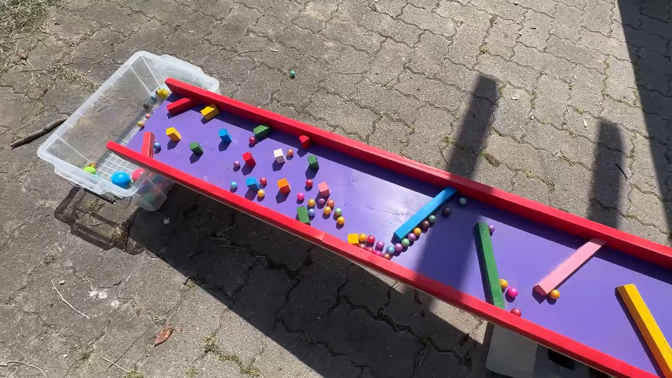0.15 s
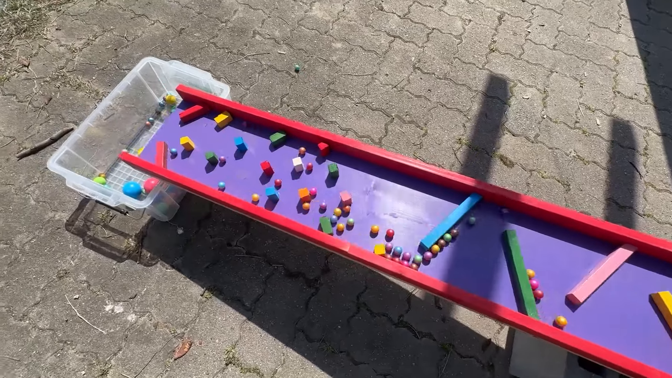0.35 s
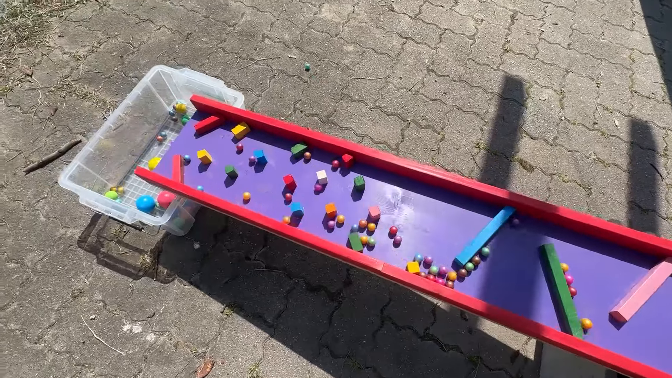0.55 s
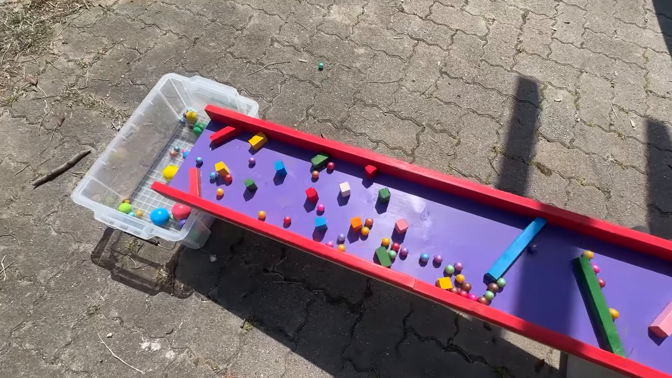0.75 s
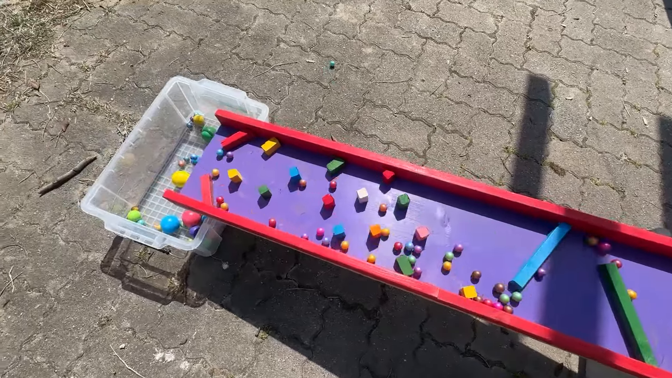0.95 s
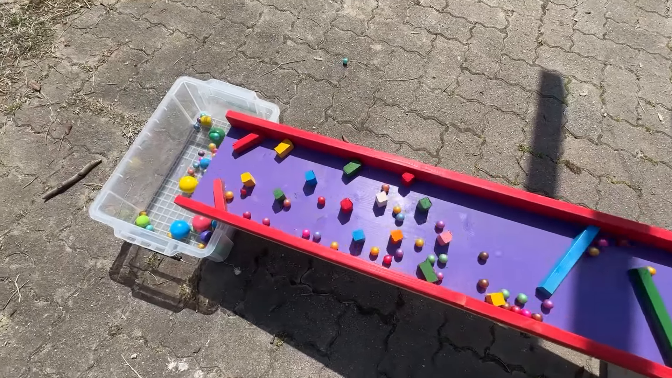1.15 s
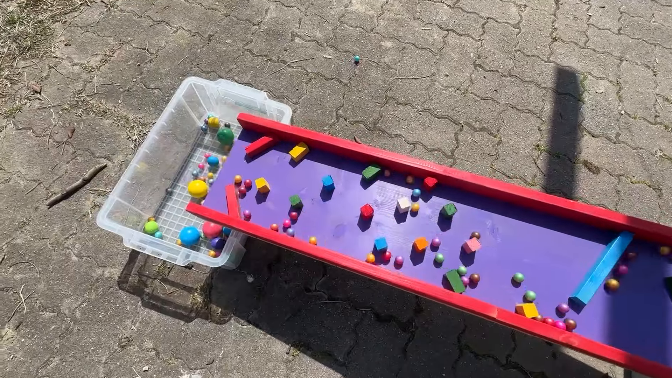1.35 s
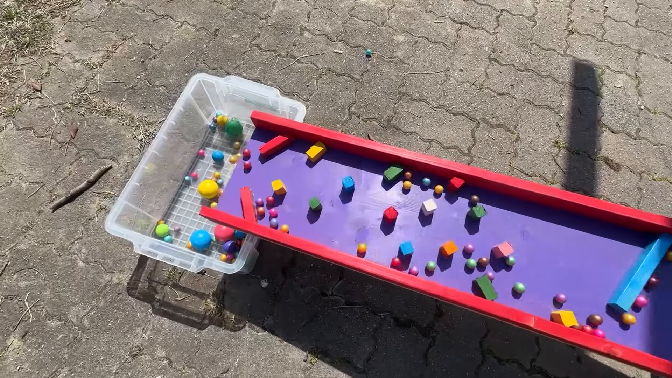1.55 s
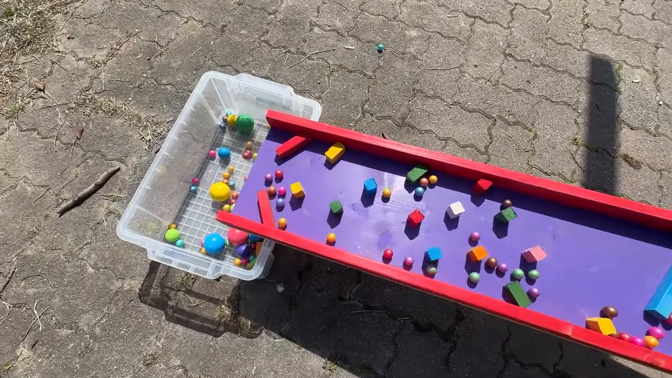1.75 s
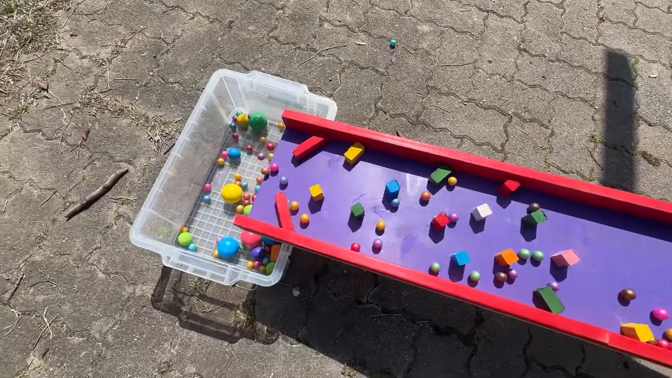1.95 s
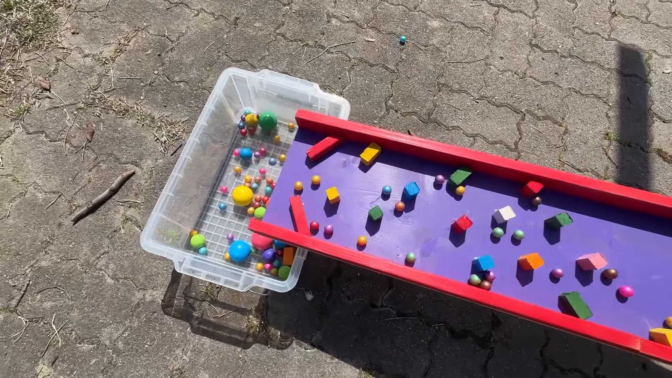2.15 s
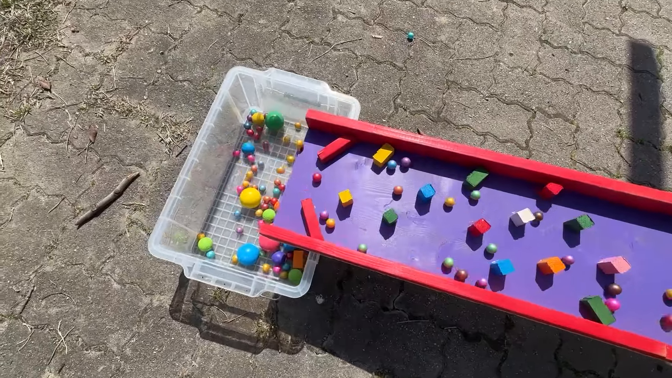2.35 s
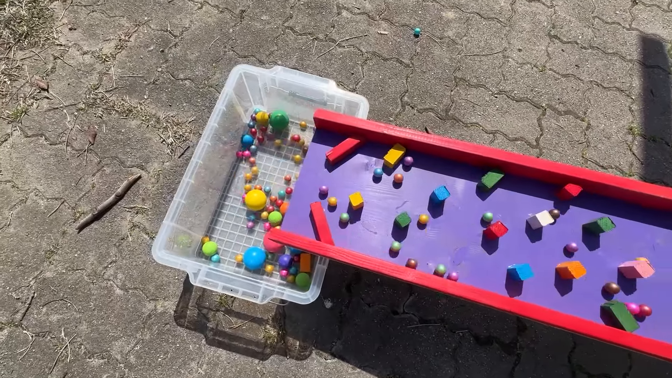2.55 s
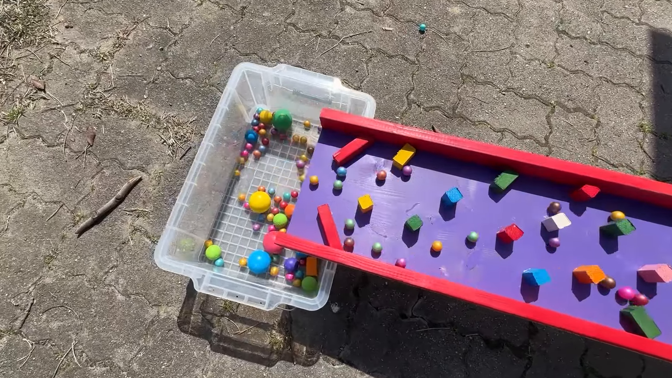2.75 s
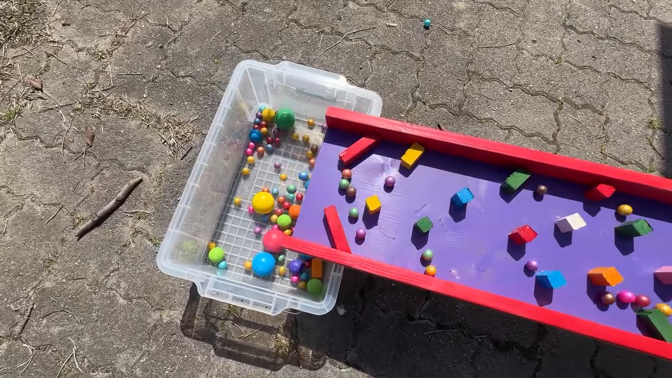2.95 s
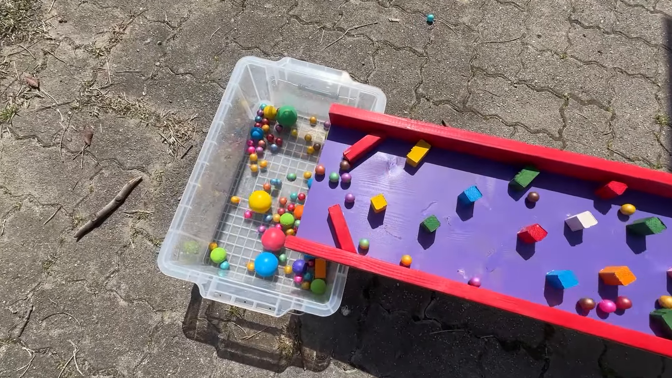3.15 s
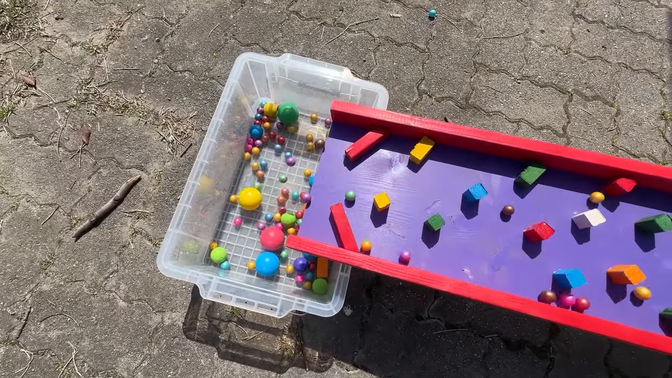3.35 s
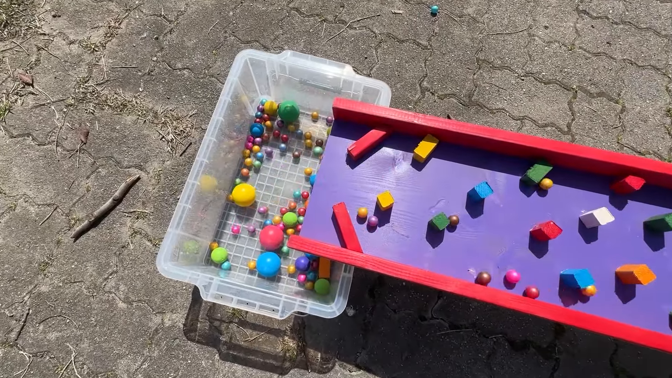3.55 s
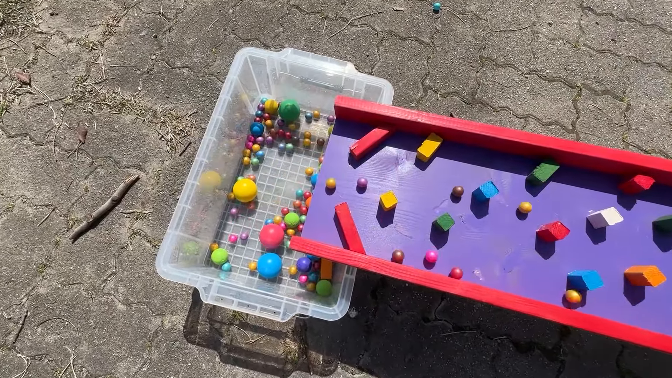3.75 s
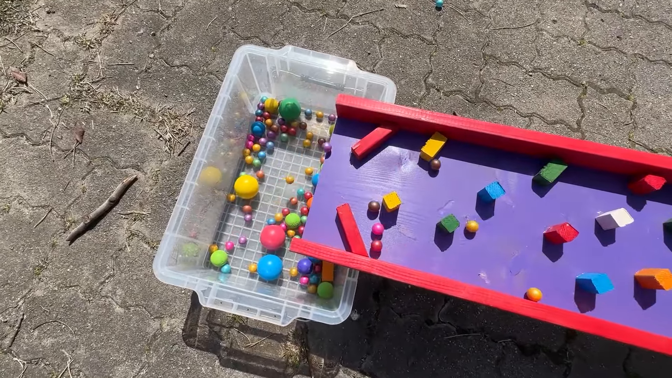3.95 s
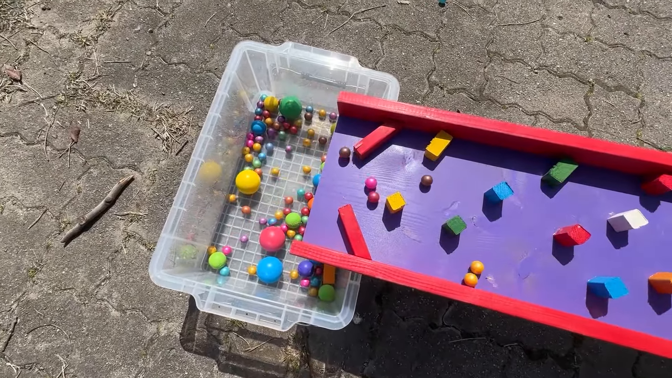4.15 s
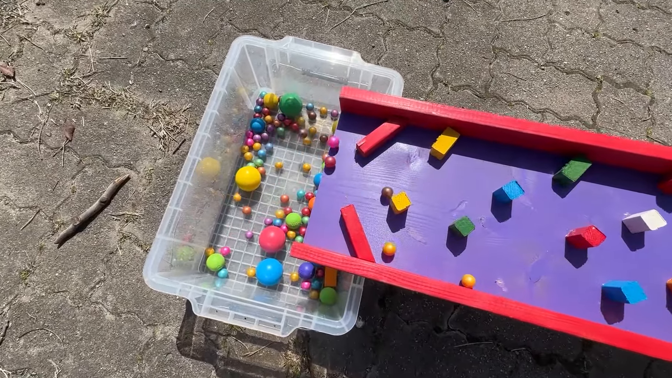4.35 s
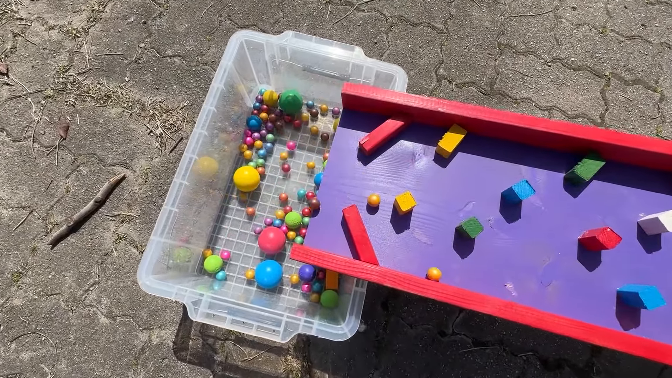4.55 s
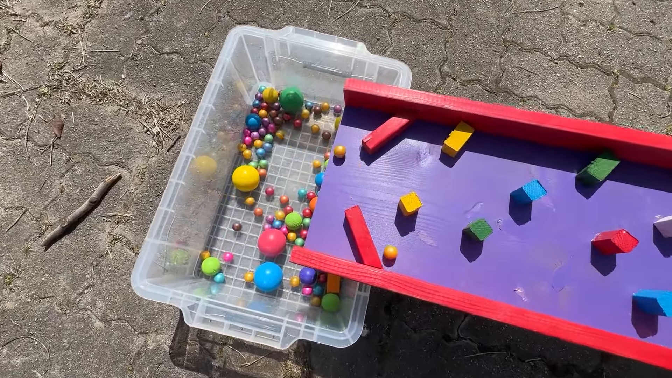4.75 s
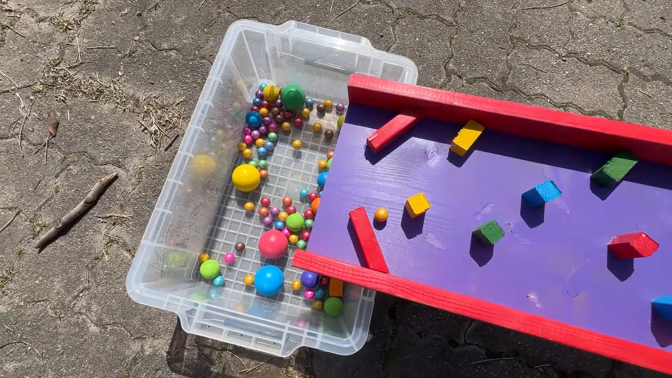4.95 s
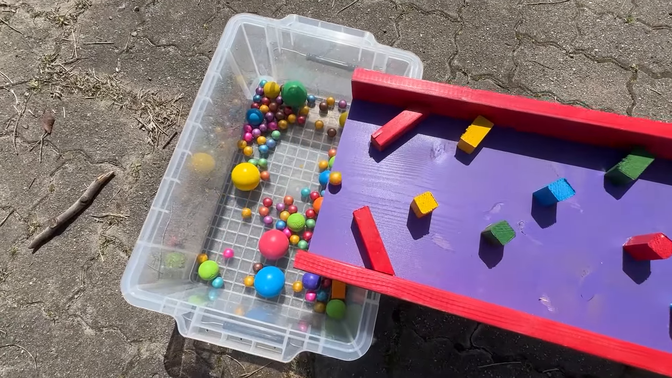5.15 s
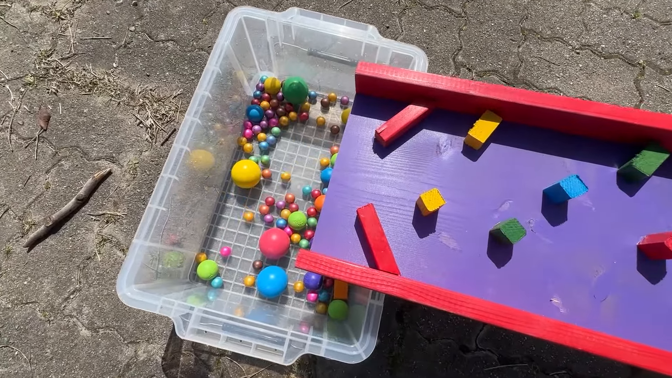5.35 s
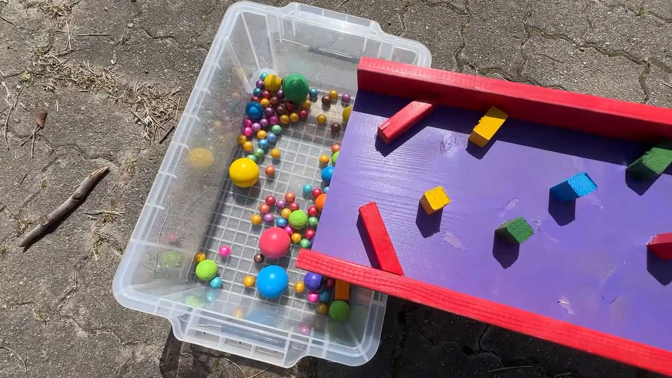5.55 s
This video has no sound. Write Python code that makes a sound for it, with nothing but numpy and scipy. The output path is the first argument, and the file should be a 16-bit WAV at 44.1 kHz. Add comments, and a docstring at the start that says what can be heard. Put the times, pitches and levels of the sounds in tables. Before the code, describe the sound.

A busy woody rattle opens: marbles rolling and bumping into small blocks, clicking against each other. After a lull in the drops, impacts in the plastic tub begin and become dense, sharp on top with a late boxy thump, each followed by settling clicks. Rolling fades as the ramp empties, leaving sparse tub hits and small bounces. Outdoor paving, little echo, the microphone moving closer to the tub.

```python
"""A paved yard: marbles roll down a wooden ramp, knock against the blocks on it and drop into a plastic tub.
Rolling is a train of tiny contacts filtered by the board; each knock is a dry tick and a gliding ring.
Each drop cracks on the thin tub floor, whose bending waves bring the bass late; hard ones stir the pile.
The rolling thins out until the last marble has fallen and bounced to rest, over a low outdoor rumble."""
import sys
import numpy as np
from scipy import signal
from scipy.fft import rfft, irfft
from scipy.io import wavfile
from scipy.ndimage import uniform_filter1d

SR = 44100
rng = np.random.default_rng(int(sys.argv[2]) if len(sys.argv) > 2 else 0)


def log_audio(samples):
    """Write samples as a 16-bit WAV file to the path given in sys.argv[1]."""
    # one column per channel
    frames = np.atleast_2d(samples).T
    # limit to full scale, then quantise
    limited = np.clip(frames, -1, 1)
    pcm = np.round(limited * 32767).astype(np.int16)
    wavfile.write(sys.argv[1], SR, pcm)


N = 247401  # samples

# marbles landing in the tub, before each band's trim: (time [s], strength [dB],
# thump re strength [dB], crack re strength [dB], treble tilt [dB per octave],
# low ring of the struck spot [Hz], its height [dB], high ring [Hz], its height [dB], crack ring [Hz])
DROPS = [(0.078, -25, -13, -3.5, 5.5, 613.0, 2, 825, 4.1, 4540),
         (1.092, -13, -20.5, -14, 5.5, 700.0, 1, 950, 6.1, 2750),
         (1.132, -32, -30.5, -9, -11, 462.0, -2, 1464.0, 4.5, 3850.0),
         (1.191, -25, -34, -8, -11, 640.0, 3.5, 1600.0, 0.5, 2980.0),
         (1.245, -19.5, -16, -6.5, 1.5, 420.0, -11, 1006.0, 3.3, 4400.0),
         (1.256, -15, -20, -14.5, 1.0, 409.0, -9, 1220, 3.5, 3520.0),
         (1.306, -14, -17.5, -9.5, 1.5, 660, 4, 1390, 9.9, 3880),
         (1.716, -13.5, -17, -9, -5.5, 314, 6, 970.0, 10.3, 4300),
         (1.77, -16.0, -9, -1.5, -5.5, 636.0, 11, 1450, 6.1, 3730.0),
         (1.819, -13.5, -13.5, -14, -2.5, 400, -3, 1100, 9.5, 3820.0),
         (2.075, -11.5, -14.5, -14, -6, 410, 2, 1130.0, 5.4, 3860),
         (2.125, -15, -8, -7.5, -6, 339, 9, 850.0, 2.0, 3510.0),
         (2.141, -15.0, -14.5, -8.5, 0.5, 344, 11, 845, 4.7, 3310.0),
         (2.172, -12, -18.0, -9.0, 1, 592.0, 3.5, 940, 2.3, 3110.0),
         (2.278, -13.5, -11.0, -8, 1.5, 600, 11.5, 850, 6.5, 4450),
         (2.483, -14, -16.5, -9, 3.5, 590, 3, 1014, 11, 4020.0),
         (2.537, -12, -9, -8, -0.5, 382, 6.0, 1110, 7, 3920),
         (2.663, -9.5, -13.5, -9, 4, 370, 6.5, 940.0, 1.8, 3500.0),
         (2.918, -11.5, -11.5, -9, -0.5, 293, 7, 910, 3.3, 3570.0),
         (2.993, -13.5, -13.5, -6.5, -1, 340, 2, 1000, 14, 3530),
         (3.07, -20.5, -15, -3, -3, 515, 10, 925.0, 3.0, 4330),
         (3.112, -13.5, -19.5, -7.5, 7.5, 680, 3, 1020, 4.5, 2840),
         (3.18, -23.5, -3, -5, 0, 389, 15.5, 1500, 11, 2830.0),
         (3.217, -18.5, -15, -14.5, -8, 544, 9, 800, 10, 2940.0),
         (3.263, -12, -17.5, -5.5, -5, 560, 6, 1260, 6, 2840),
         (3.37, -10, -16.5, -13, -4, 344.0, 6, 920, 11.5, 2810.0),
         (3.425, -14, -13.5, -7.5, -10, 353, 9, 860, 6.5, 3900),
         (3.448, -8.5, -16, -10, 0.5, 620.0, -1.0, 1230, 5.0, 2810.0),
         (3.529, -10.0, -14.5, -9, 1, 326.0, 0, 986, 8.5, 3260),
         (3.644, -20.5, -20.5, -10, -7, 674, -2, 1300, 8.4, 2880),
         (3.728, -11.5, -10.5, -7.5, 0.0, 364, 5, 1190, 7.5, 3400),
         (3.995, -12.5, -12.5, -8, -1.5, 344.0, 2.5, 980, 8.8, 3100),
         (4.147, -10.0, -9.5, -8.0, 2.0, 380, 7.5, 1510, 5, 3640.0),
         (4.403, -11, -11, -10.5, 2, 362, 15.5, 1410, 5.7, 4020.0),
         (4.527, -28.5, -12.0, -11, 4, 667.0, 6, 1030.0, 1.5, 3680.0),
         (4.55, -9.5, -12.5, -8.0, 3, 298.0, 6, 980, 6.0, 3730),
         (4.581, -16, -17, -16, 0, 363, 4, 794, 2.5, 2810.0),
         (4.63, -16.5, -13, -12.5, -6, 400, 11.5, 1520, 12, 3420.0),
         (4.737, -16, -16, -6.5, -2.5, 640, 16.5, 1190, 2.3, 4180.0),
         (4.751, -17.0, -7.5, -9, 0.5, 405, 12, 820.0, 8.6, 3840),
         (4.813, -20, -17.5, -8, 1, 374, 6, 1670.0, 4.0, 2750),
         (4.886, -21, -17.5, -12.5, -4.5, 260, 11, 1500, 4.5, 4180.0),
         (4.977, -15, -6.5, -5, 2.0, 372.0, 5.5, 1020, 6.1, 3730.0),
         (5.036, -21.5, -14.0, -9, -9, 388, 11, 1115, 16, 3650.0),
         (5.087, -21, -21.5, -16.5, 0, 282, 16, 1540, 10, 4310.0),
         (5.365, -11.5, -12.0, -9, 0.5, 409.0, 2.5, 994, 9.1, 4020),
         (5.442, -24.5, -10, -9.5, -9, 665, 5, 875, 7.4, 3260),
         (5.571, -52, -4.0, -34.0, 2.0, 456, 5, 776, 14.5, 2810.0),
         (5.601, -39, -13, -30, -0.5, 413.0, 13, 820, 8.5, 2810.0)]
# marbles rolling on the ramp, before each layer's trim: (time [s], level [dB])
ROLLING = [(0.0, -38.5), (0.96, -42.5), (1.21, -37), (1.9, -39.5), (2.0, -38.5), (2.12, -37.5), (2.39, -38),
           (2.78, -38), (3.39, -36), (4.24, -44), (4.36, -43), (4.44, -40), (4.62, -42.5), (5.05, -50),
           (5.18, -44), (5.27, -74.5), (5.61, -65)]
# resonances and hollows of the tub: (frequency [Hz], width [Hz], height [dB])
TUB_MODES = [(398.5, 96, 3.5), (490, 130, -2), (674, 170, 3), (728.5, 69, -11), (910, 71, 3),
             (1310, 67, -6), (1584, 250, 3.5), (1720, 76, -13.5), (1958, 190, 4), (4100, 1080, -0.5)]
# sound of the long board and the open air, arriving from many sides:
# (frequency [Hz], left-right likeness [-1 to 1])
RAMP_LIKENESS = [(60, 0.44), (180, 1), (400, 0.57), (700, -0.28), (1400, -0.62), (3000, -0.28),
                 (15000, 0.64)]

# tiny contacts in the shaken pile and under the rolling marbles, and the amplitude of the smooth hiss between
PILE_HOPS_PER_S, ROLL_BUMPS_PER_S, WASH = 900, 1400, .14
HALF_EMPTY_S, EMPTYING_S = 3.3, 2.4  # when half the marbles have left the ramp, and how long the crowd takes
FILLING_DB_PER_S = 1.55  # the pile rattles more as the tub fills


def gain_of(db):
    """Level: converts decibels to an amplitude ratio."""
    return 10 ** (np.asarray(db) / 20)


def evened(x):
    """Normalisation: scales to an rms of 1."""
    return x / np.sqrt(np.mean(x ** 2) + 1e-20)


def blow_level(x):
    """Onset level: the rms of a stereo hit over its first 16 ms."""
    blow_s = .016
    return np.sqrt(np.mean(x[:, :round(blow_s * SR)] ** 2) + 1e-20)


def read(points, hz):
    """Interpolation: reads a table on a logarithmic frequency axis."""
    f, value = np.transpose(points)
    return np.interp(np.log(hz + 1), np.log(np.sort(f) + 1), value)


def add(mix, s, sound):
    """Superposition: mixes a sound in at time s."""
    part = mix[:, max(round(s * SR), 0):][:, :sound.shape[1]]
    part += sound[:, :part.shape[1]]


def axes(size):
    """Sampling: the time [s] and frequency [Hz] axes of a sound of this length."""
    return np.arange(size) / SR, np.fft.rfftfreq(size, 1 / SR)


def wander(per_s):
    """Slow random modulation of rms 1: straight lines between random knots, per_s of them a second."""
    knots = rng.standard_normal(4000)
    return evened(np.interp(np.arange(N) / SR * per_s, np.arange(len(knots)), knots))


def colour(spectrum, modes, hz):
    """Resonance: a broad spectrum with peaks and hollows on it."""
    peaks_db = sum(db / (1 + ((hz - f) / (width / 2)) ** 2) for f, width, db in modes)
    return gain_of(read(spectrum, hz) + peaks_db)


def causal(gain):
    """Minimum phase: a real body rings only after it is struck; found by folding the cepstrum."""
    cepstrum = irfft(np.log(gain))
    half = len(cepstrum) // 2
    cepstrum[1:half] *= 2
    cepstrum[half + 1:] = 0
    return np.exp(rfft(cepstrum))


def bending(hz, cycles=0.98, lag_s=0.000606):
    """Dispersion of bending waves in a thin plate: the treble arrives first, the bass last."""
    lateness_s = cycles / (hz + 25) + lag_s * np.sqrt(1000 / (hz + 100))
    # phase is the integral of group delay over frequency
    return np.exp(-2j * np.pi * np.cumsum(lateness_s) * hz[1])


def pair(z, hz, likeness=None):
    """Interaural coherence: makes two unrelated spectra as alike as the two microphones hear them."""
    # the tub at the two microphones: (frequency [Hz], left-right likeness [clipped to -1 to 1])
    tub_likeness = [(40, 3), (150, 2.6), (350, 0.4), (700, 1.27), (1400, -1), (3000, 0.74), (6000, -0.5),
                    (9000, 0), (11000, 2.7), (16000, 5)]
    same = np.clip(read(tub_likeness if likeness is None else likeness, hz), -1, 1)
    return np.array([z[0], same * z[0] + np.sqrt(1 - same ** 2) * z[1]])


def ports(hz):
    """Interchannel phase and level differences: how the two microphones hear one source."""
    # left minus right: (frequency [Hz], level [dB])
    balance = [(60, 4.5), (200, 4), (400, 3), (800, 5), (1400, 6.5), (2800, -1.5), (5500, 5), (10000, -0.5),
               (16000, 0)]
    # phase by which left leads: (frequency [Hz], lead [rad])
    lead = [(40, 0.91), (430, 0.5), (780, 2.04), (1030, 1.4), (1290, 2.57), (2500, 2.29), (3360, 3.02),
            (4310, 5.24), (6300, 8.2), (6900, 6.9), (9200, 8.3), (10400, 7.05), (12700, 6.5), (16000, 3.6)]
    lean = gain_of(read(balance, hz) / 2)
    return np.array([lean, np.exp(-1j * read(lead, hz)) / lean])


def force_train(per_s, spread_db):
    """Poisson process: contacts at random moments, their force spread exponentially in decibels."""
    struck = rng.random(N) < per_s / SR
    return struck * gain_of(spread_db * np.minimum(rng.exponential(1, N), 3))


def grains(per_s, spread_db, wash):
    """Shot noise: one train of tiny contacts of uneven force over a smooth wash, heard in both channels, each
    with its own noise."""
    taps = force_train(per_s, spread_db) + wash
    return evened(taps * rng.standard_normal((2, N)))


def ticks(spectrum, per_s, spread_db, fade_s, octaves, count=12):
    """Superposed impacts: a swarm of tiny contacts, shared among count narrow bands."""
    t, hz = axes(1024)
    out = np.zeros((2, N))
    for centre_hz in np.geomspace(2800, 13000, count):
        band = 1 / (1 + (np.log2((hz + 1) / centre_hz) / octaves) ** 4)
        burst = rng.standard_normal((2, len(t))) * np.exp(-t / fade_s)
        body = causal(band * gain_of(read(spectrum, hz)))
        snap = irfft(pair(rfft(burst), hz) * body * ports(hz))
        train = force_train(per_s / count, spread_db)
        out += signal.oaconvolve(train[None], snap, axes=1)[:, :N]
    return evened(out)


def fullness(t):
    """Depletion: the share of the marbles that still crowd the ramp falls linearly."""
    return np.clip(.5 + (HALF_EMPTY_S - t) / EMPTYING_S, 0, 1)


def air(swell_db=2.0, lean_db=2.0):
    """Ambient noise: a low, distant outdoor rumble, partly coherent at the two microphones."""
    # background spectrum: (frequency [Hz], relative density [dB per Hz])
    air_spectrum = [(20, -6.5), (45, -6), (80, -1), (130, -6), (220, -8), (380, -5), (800, -23.5),
                    (1500, -36), (3000, -39.5), (6000, -40.5), (15000, -60)]
    # slow swell: (time [s], level [dB])
    air_level = [(0, -58.5), (1.2, -63), (3.2, -64), (4.0, -48.5), (5.61, -55)]
    t, hz = axes(N)
    noise = pair(rfft(rng.standard_normal((2, N))), hz, RAMP_LIKENESS)
    rumble = irfft(noise * gain_of(read(air_spectrum, hz)), N)
    rumble = evened(rumble * gain_of(swell_db * wander(2.8)) * gain_of([[lean_db], [-lean_db]]))
    return rumble * gain_of(np.interp(t, *np.transpose(air_level)))


def yard(x, level_db=-21, t60=0.061, dull_hz=4500):
    """Diffuse reflection: weak scattered echoes from paving and nearby walls."""
    t, hz = axes(16384)
    sparse = (rng.random((2, len(t))) < .05) * (t > .008)  # no echo in the first 8 ms
    taps = rng.standard_normal((2, len(t))) * sparse * gain_of(-60 * t / t60)
    tail = irfft(rfft(taps / np.linalg.norm(taps[0])) / (1 + 1j * hz / dull_hz))
    return gain_of(level_db) * signal.fftconvolve(x, tail, axes=1)[:, :N]


def rolling(trim_db=2.5, patchy_db=2.0, bump_db=2.0, bumps_per_s=70, lean_db=-0.2, spread_db=2.0):
    """Rolling excitation: the grain of the board makes tiny contacts, whose colour and loudness shift."""
    # the ramp under rolling marbles: (frequency [Hz], relative density [dB per Hz])
    ramp_spectrum = [(45, -20.5), (100, -11.5), (170, -7.5), (280, 0), (430, 2.5), (650, 2), (900, 1.5),
                     (1400, -2.5), (2300, 1), (3300, -22), (5000, -28.5), (9000, -34), (15000, -55.5)]
    # resonances and hollow of the board: (frequency [Hz], width [Hz], height [dB])
    ramp_modes = [(440, 21, 7), (512, 30, 5), (646.6, 41, 8), (820, 94, 1.5), (1130, 380, 6),
                  (1440, 255, 6.5), (2345, 240, -11)]
    t, hz = axes(N)
    contacts = pair(rfft(grains(ROLL_BUMPS_PER_S, spread_db, WASH)), hz, RAMP_LIKENESS)
    noise = irfft(contacts * colour(ramp_spectrum, ramp_modes, hz) * bending(hz), N)
    # smooth random patches over frequency and time
    z = signal.stft(noise, nperseg=512, noverlap=384)[2]
    patches = uniform_filter1d(rng.standard_normal(z.shape[1:]), size=4, axis=0)
    patches = evened(uniform_filter1d(patches, size=7, axis=1))
    rumble = signal.istft(z * gain_of(patchy_db * patches), nperseg=512, noverlap=384)[1][:, :N]
    rumble = evened(rumble * gain_of(bump_db * wander(bumps_per_s)) * gain_of([[lean_db], [-lean_db]]))
    return rumble * gain_of(np.interp(t, *np.transpose(ROLLING)) + trim_db)


def patter(trim_db=-15, per_s=130, spread_db=4, octaves=0.29, fade_s=0.0028):
    """Random light impacts: tiny dry ticks as crowded marbles brush each other and hop on the board."""
    # marbles brushing each other on the ramp: (frequency [Hz], relative density [dB per Hz])
    patter_spectrum = [(2500, 2), (4000, -1.5), (6000, -11), (10000, -12), (16000, -14.5)]
    t = axes(N)[0]
    swarm = ticks(patter_spectrum, per_s, spread_db, fade_s, octaves) * np.sqrt(fullness(t))
    return swarm * gain_of(np.interp(t, *np.transpose(ROLLING)) + trim_db)


def knock(ring_hz, ring_db, tick_db, block_hz, top_db, pan_db, rough,
          swoop=0.602, glide_s=0.00127, ring_s=0.0041, block_width_hz=700, block_db=7):
    """Impact and dispersion: a tick with the block's note, a first swing, then a rounder bending-wave ring."""
    # tick of a marble on wood: (frequency [Hz], relative density [dB per Hz])
    tick_spectrum = [(200, -17.5), (600, -10.5), (1500, 12.5), (2500, 1.5), (4000, 2), (5200, -3.5),
                     (7500, -6.5), (10500, -16), (16000, -38.5)]
    t, hz = axes(4096)
    # the pitch glides down to ring_hz
    turns = np.cumsum(ring_hz * (1 + swoop * np.exp(-t / glide_s))) / SR
    # the rougher the ring, the less its phase agrees at the two microphones
    turns = turns + rng.random() + .2 * rough * rng.standard_normal((2, 1))
    real, imaginary = evened(uniform_filter1d(rng.standard_normal((2, 2, len(t))), size=40))
    grain = real + 1j * imaginary  # many paths through the board blur the ring
    first, swing_s, arrive_s = .8, .0031, .0072
    swing = first * (t / 0.0019) * np.exp(-(t / swing_s) ** 2)
    wave = 1 / (np.exp((arrive_s - t) / 0.0011) + np.exp((t - arrive_s) / ring_s))
    scatter = rough * (swing + wave) + .09 * np.exp(-t / .02) * (t > arrive_s)
    ring = (np.exp(2j * np.pi * turns) * (swing + wave + scatter * grain)).real
    burst = rng.standard_normal((2, len(t))) * (np.exp(-t / .0028) + .24 * np.exp(-t / .012))
    top = 1 / (1 + (6000 / (hz + 1)) ** 6)
    wood = colour(tick_spectrum, [(block_hz, block_width_hz, block_db)], hz) * gain_of(top_db * top)
    tick = irfft(pair(rfft(burst), hz, RAMP_LIKENESS) * causal(wood))
    sound = ring / blow_level(ring) * gain_of(ring_db) + tick / blow_level(tick) * gain_of(tick_db)
    return sound * evened(gain_of([[pan_db / 2], [-pan_db / 2]]))


def jostles(ring_db=-49, tick_db=-60, spread_db=2, tick_spread_db=3,
            octaves=0.184, block_hz=3900, block_octaves=0.36):
    """Random impacts: faint knocks, fewer and lower as the ramp empties; the harder ones tick more brightly."""
    per_s = 70  # while the ramp is full
    full_ring_hz, empty_ring_hz = 2252, 1560  # typical ring on the full and on the nearly empty ramp
    out, slots = np.zeros((2, N)), np.arange(0, N, 128) / SR
    full = fullness(slots)
    ring_hz = empty_ring_hz + (full_ring_hz - empty_ring_hz) * full
    chance = rng.random(len(slots))
    size, pitch, note, side = rng.standard_normal((4, len(slots))).clip(-2, 2)
    for k in np.flatnonzero(chance < per_s * full * slots[1]):
        own_ring_hz = ring_hz[k] * 2 ** (octaves * pitch[k])
        note_hz = block_hz * 2 ** (block_octaves * note[k])
        own_ring_db = ring_db + spread_db * size[k]
        own_tick_db = tick_db + tick_spread_db * size[k]
        add(out, slots[k], knock(own_ring_hz, own_ring_db, own_tick_db, note_hz, 0, 3 * side[k], rough=.8))
    return out


def knocks(ring_db=-10, tick_db=-3):
    """Impact on wood: marbles run into the blocks; the low notes ring clearest. One row, at 4.3955 s, is a
    marble landing in the tub."""
    # the clearest knocks, before the trims: (time [s], strength [dB], ring [Hz], tick re strength [dB], note of
    # the block [Hz], top of the tick [dB], left minus right [dB]); the row at 4.3955 s is a marble landing in
    # the tub
    block_hits = [(0.002, -24.5, 2540, -15, 3770.0, 0.0, 0.0),
                  (0.0296, -33, 2396, -16.5, 4510.0, -3.0, 0.0),
                  (0.0664, -23.5, 2000, -9.5, 5630.0, 0.0, 6), (0.1452, -30, 1500, -14.5, 3250.0, 6, 6),
                  (0.163, -33, 2440, -6, 3250.0, 2, 2), (0.2156, -30, 1894, -7.5, 4660.0, 5, 3),
                  (0.227, -24.5, 2006, -14, 3510.0, 10, -2), (0.2723, -35, 1900, -3.5, 3210.0, 7, 4.0),
                  (0.3114, -34.5, 2810, 2.5, 3970.0, 4, 2), (0.3505, -27, 1864, -10.5, 3820.0, -1.5, 1),
                  (0.441, -30, 1695, -8, 3210.0, -10, 3.0), (0.4704, -26, 2290.0, 0.5, 6400.0, 3.5, 6),
                  (0.5155, -30.5, 1880, -6, 4010.0, -7, 0.0), (0.566, -31, 2010, -2.5, 3210.0, -4, 6),
                  (0.6277, -31, 1407, -11.5, 3250.0, 8, 5), (0.652, -24, 2325, -24.5, 3210.0, 18, -2.5),
                  (0.7164, -32, 2370, -6.5, 3400.0, 7, -2), (0.7763, -35, 2760, -15, 3210.0, -4, -8),
                  (0.828, -32, 1550, -10.5, 3470.0, 1, 0.0), (0.855, -33.5, 2010, -10, 3550.0, -12, -5.0),
                  (0.9499, -28.5, 1607, 1.5, 4970.0, 0, -1), (1.063, -32, 1790, -26.5, 4010.0, -0.5, -2),
                  (1.3548, -22.5, 2020, -5.5, 4250.0, -0.5, 4), (1.379, -30, 2045, -11, 3510.0, -2, -3),
                  (1.3994, -29.5, 1840.0, -21, 4150.0, 2.5, -8), (1.43, -35, 1560, -2, 3620.0, -11, 2),
                  (1.477, -34, 2180.0, -28.5, 3220.0, -3.5, -5),
                  (1.505, -22.5, 1763, -10.5, 3590.0, 11, -1), (1.5475, -24, 2064, -11.5, 3970, 3, 3),
                  (1.553, -25, 2387, -11, 3700, -2, -4), (1.62, -27, 2340, -4, 3420.0, -11, -2),
                  (1.624, -35.5, 3140, -15.5, 3490.0, -5, 0.5), (1.6565, -28.5, 2090, -10, 3210.0, -6, -5),
                  (1.6925, -28, 1920.0, -18.0, 3210.0, -7, -9), (1.74, -26.5, 1900, -15.5, 4860.0, 4, -10),
                  (1.8953, -27.5, 1860, -9.5, 3990.0, 3.0, 5.0), (1.9166, -24, 1580, -16, 4920.0, 8, 0.0),
                  (1.945, -33, 1964, -35.0, 3210.0, -4.0, -7), (2.026, -36, 3160, -13, 3400.0, -5.5, -1.5),
                  (2.0624, -22, 1953, -15, 3400, -4, 7), (2.0646, -23.5, 2790, -13, 3330, -2, 3),
                  (2.1614, -30.5, 1470, 5, 3640.0, 1, 10), (2.195, -25.5, 2390, -23, 3730.0, 7, -2),
                  (2.227, -23, 2190, -18.5, 3210.0, 1, -10.0), (2.2547, -25.5, 2220, -12, 3220.0, -4, -2),
                  (2.371, -26.5, 1340.0, -14.5, 3210.0, 3, -11),
                  (2.4067, -27, 1530, -29.5, 6190.0, -0.5, 7), (2.4656, -20.5, 1500, -8, 3670.0, 11, 1.5),
                  (2.7125, -19, 1455, -5, 3270.0, -6, -1), (2.7603, -22, 1418, -10.5, 3690.0, 0.0, -3),
                  (2.846, -23, 1424, -8.5, 3600.0, 5, -2.0), (2.884, -27, 1910, -13, 6410.0, -4, -5),
                  (2.907, -27, 1380, -14.0, 3210.0, 4, -6), (2.972, -26, 1640, -9, 3930.0, 1, -1),
                  (3.188, -22.5, 1434, -5.0, 3680.0, -11, -3), (3.498, -27, 1720, -6.5, 3980.0, 6, 0.5),
                  (3.5783, -20.5, 1400, -4, 3210.0, -9, 8), (3.7036, -23, 1597, -9, 3900.0, 8, 4.5),
                  (3.8273, -15, 1457, -21.5, 4730.0, -1.0, -3.5),
                  (3.8953, -16, 1442, -7.5, 3470.0, 2, -1.5), (3.9215, -43, 1460, -3.5, 4790.0, -14, 1),
                  (3.952, -17.5, 1440, -15.0, 3600.0, -6, -6), (3.965, -30, 1810, -3, 3210.0, -2.0, -2),
                  (4.054, -29.5, 1580, -18, 4530.0, -4, 7), (4.3955, -21.5, 1433, -6.0, 4490.0, -6, -4.0)]
    out = np.zeros((2, N))
    for s, strength_db, ring_hz, sharp_db, block_hz, top_db, pan_db in block_hits:
        rough = np.interp(ring_hz, [1450, 2000], [.22, .5])
        own_tick_db = strength_db + sharp_db + tick_db
        add(out, s, knock(ring_hz, strength_db + ring_db, own_tick_db, block_hz, top_db, pan_db, rough))
    return out


def click(level_db, centre_hz, fade_s=0.0039, octaves=0.58):
    """Contact of two hard spheres: a very short snap, brighter the briefer their contact."""
    t, hz = axes(2048)
    burst = rng.standard_normal((2, len(t))) * (np.exp(-t / fade_s) + 0.065 * np.exp(-t / 0.0073))
    band = 1 / (1 + (np.log2((hz + 1) / centre_hz) / octaves) ** 4)
    snap = irfft(pair(rfft(burst), hz) * band * ports(hz))[:, :len(t) * 3 // 4]
    return snap / blow_level(snap) * gain_of(level_db)


def clicks(trim_db=1.5):
    """Elastic collision: marbles hit each other on the ramp and rebound into their neighbours in the tub."""
    # the clearest clicks, before the trim: (time [s], strength [dB], centre [Hz])
    marble_hits = [(0.008, -51, 5300.0), (0.24, -46, 6100.0), (0.73, -50, 7660), (0.848, -52.5, 8200.0),
                   (0.9363, -47, 6900), (1.214, -50.0, 7100.0), (1.289, -44, 5300.0), (1.322, -41, 5900.0),
                   (1.586, -54.0, 7200.0), (1.594, -50, 7100.0), (1.61, -51, 9100.0),
                   (1.669, -45.5, 8100.0), (1.684, -52.5, 7500.0), (2.383, -48.5, 9200.0),
                   (2.606, -43, 9000), (2.748, -51.5, 8000.0), (2.796, -49.5, 8260), (2.869, -48, 8700.0),
                   (2.886, -48, 8700.0), (2.969, -46, 6500.0), (3.0528, -48, 7500.0), (3.127, -47, 7900.0),
                   (3.243, -41, 9050), (3.405, -39.5, 9000), (3.506, -43, 7700.0), (3.625, -46.5, 7900.0),
                   (4.035, -61, 5300.0), (4.065, -43, 9200), (4.087, -46.0, 8560), (4.098, -52, 8500),
                   (4.196, -50, 5400.0), (4.301, -48.5, 7900), (4.312, -50.5, 8550), (4.3946, -38, 7000),
                   (4.4263, -37.0, 7700), (4.44, -40.5, 7400.0), (4.463, -51, 6000.0),
                   (4.495, -47.5, 6600.0), (4.596, -46, 5500.0), (4.639, -45, 5500.0), (4.664, -38.5, 7800),
                   (4.686, -49, 8400), (4.715, -47, 7760), (4.8596, -50.0, 7800.0), (5.02, -42, 5500.0),
                   (5.0577, -37, 7160), (5.096, -47.0, 8100.0), (5.423, -48, 8200.0), (5.468, -48, 7700),
                   (5.496, -74, 6400.0), (5.5217, -58, 9050), (5.547, -73, 6700.0)]
    out = np.zeros((2, N))
    for s, strength_db, centre_hz in marble_hits:
        add(out, s, click(strength_db + trim_db, centre_hz))
    return out


def rattle(level_db=-42, per_s=380, spread_db=8.0, octaves=0.29, fade_s=0.0044,
           settle_s=0.064, wait_s=0.0085):
    """Energy decay: after each drop the marbles of the pile click against each other as they settle."""
    # marbles settling in the pile: (frequency [Hz], relative density [dB per Hz])
    rattle_spectrum = [(2500, -6), (4000, -1), (6000, 2), (10000, -10.5), (16000, -17)]
    hard_drop_db = 0.5  # reference strength
    t = axes(N)[0]
    power = np.zeros((1, N))
    settling = np.exp(-(t[None, :SR // 3] / settle_s) ** 2)
    for s, strength_db, *_ in DROPS:
        stirred = gain_of(strength_db - hard_drop_db + FILLING_DB_PER_S * s)
        add(power, s + wait_s, stirred ** 2 * settling)
    return ticks(rattle_spectrum, per_s, spread_db, fade_s, octaves) * np.sqrt(power) * gain_of(level_db)


def pile(level_db=-29.5, loose_db=-16, knee_db=0.5, hold_s=0.052, steep=7.8, rise_s=0.0021, spread_db=0.5):
    """Threshold excitation: drops harder than loose_db make the pile chatter; soft ones barely stir it."""
    # tub shaken by the rattling pile: (frequency [Hz], relative density [dB per Hz])
    pile_spectrum = [(25, -25), (70, -18), (150, -10.5), (280, -4), (600, 2), (1400, -2), (2100, -8),
                     (3000, -7.5), (4500, -15.5), (6000, -26.5), (10500, -34.5), (16000, -57)]
    floor_covered_s = 1.71  # until then few marbles lie in the tub to be shaken
    t, hz = axes(N)
    power = np.zeros((1, N))
    age = t[:SR // 3]
    shake = (1 - np.exp(-(age / rise_s) ** 2)) / (1 + (age / hold_s) ** steep)
    for s, strength_db, *_ in DROPS:
        filled = min(s / floor_covered_s, 1) * gain_of(FILLING_DB_PER_S * s)
        stirred = filled / (1.5 + np.exp((loose_db - strength_db) / knee_db))
        add(power, s, stirred ** 2 * shake[None])
    contacts = grains(PILE_HOPS_PER_S, spread_db, WASH) * np.sqrt(power)
    chatter = pair(rfft(contacts), hz) * bending(hz)
    tub = evened(colour(pile_spectrum, TUB_MODES, hz))
    return gain_of(level_db) * irfft(chatter * tub * ports(hz), N)


def drops(thump_db=-1.0, body_db=-8, crack_db=-5, bass_s=0.01, ring_s=0.0092, crack_s=0.0031,
          scatter_db=-3, bass_scatter_db=-7, crack_scatter_db=7,
          low_width=0.16, high_width=0.11, crack_width=0.18, crack_ring_db=5.0, place_s=0.00001):
    """Impact on a dispersive plate: a blow and its reflections from the rims, swept down by bending waves."""
    # tub floor at the blow: (frequency [Hz], relative density [dB per Hz])
    floor_spectrum = [(25, -37.5), (60, -17), (170, -7), (300, -3), (600, -4.5), (1100, -6), (1700, -9),
                      (2800, -9.5), (4200, -11), (5500, -13.5), (8000, -19.5), (10500, -17.5),
                      (13000, -28.5), (16000, -26.5)]
    # the deep bass grows as the microphones near the tub, before each band is levelled
    bass_growth_db_per_s, bass_even_s, bass_hz = 2.0, 1.9, 130
    t, hz = axes(8192)
    low = 1 / (1 + (hz / 600) ** 6)
    high = 1 / (1 + (2500 / (hz + 1)) ** 6)
    deep = 1 / (1 + (hz / bass_hz) ** 4)
    travel = ports(hz) * bending(hz)
    # (band gain, fade [s], reflections [dB], trim [dB])
    bands = [(low, bass_s, bass_scatter_db, thump_db),
             (1 - low - high, ring_s, scatter_db, body_db),
             (high, crack_s, crack_scatter_db, crack_db)]
    out = np.zeros((2, N))
    for (s, strength_db, low_db, high_db, db_per_octave,
         low_hz, low_ring_db, high_hz, high_ring_db, crack_hz) in DROPS:
        # every spot on the floor favours three resonances of its own and has its own path to the microphones
        spot = [(low_hz, low_width * low_hz, low_ring_db),
                (high_hz, high_width * high_hz, high_ring_db),
                (crack_hz, crack_width * crack_hz, crack_ring_db)]
        tub = causal(colour(floor_spectrum, TUB_MODES + spot, hz)) * travel
        tub *= np.exp(-2j * np.pi * hz * place_s * rng.standard_normal((2, 1)))
        tub *= gain_of(db_per_octave * np.log2(np.clip(hz, 3500, 12000) / 3500))
        tub *= gain_of(deep * bass_growth_db_per_s * (s - bass_even_s))
        noise = rng.standard_normal((2, len(t)))
        for share_db, (band, fade_s, echo_db, trim_db) in zip((low_db, 0, high_db), bands):
            echoes = noise * (np.exp(-t / fade_s) + 0.28 * np.exp(-t / 0.011))
            echoes = pair(rfft(echoes), hz) / np.linalg.norm(echoes[0])
            # the direct blow is the 1
            hit = irfft((1 + gain_of(echo_db) * echoes) * tub * band)[:, :len(t) // 2]
            add(out, s, hit / blow_level(hit) * gain_of(strength_db + share_db + trim_db))
    return out


def scene():
    """Superposition: ramp and tub in the open yard; only the impacts echo."""
    steady = air() + rolling()
    hits = patter() + jostles() + knocks() + clicks() + rattle() + pile() + drops()
    return hits + yard(hits) + steady


def record(dry):
    """Linear filtering: the colour of the microphone ports, then the recorder's band limit."""
    # resonances and hollows of the microphone ports: (frequency [Hz], width [Hz], height [dB])
    port_modes = [(5230, 330, -4.5), (7300, 640, 2), (7510, 420, -7.5), (9550, 260, -5.5), (10500, 300, 0),
                  (15540, 1600, -2)]
    edge_hz = 16200
    hz = axes(2048)[1]
    port = irfft(causal(colour([(0, 0.0047)], port_modes, hz)))
    coloured = signal.oaconvolve(dry, port[None])[:, :N]
    band_limit = signal.firwin(301, edge_hz, window=("kaiser", 9), fs=SR)
    return signal.oaconvolve(coloured, band_limit[None], "same")


dry = scene()
out = record(dry)
log_audio(out)
```